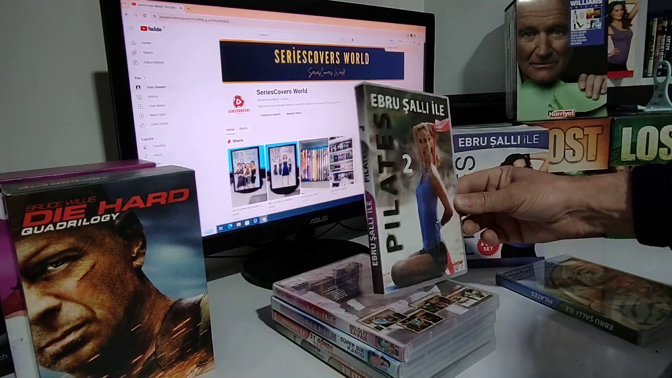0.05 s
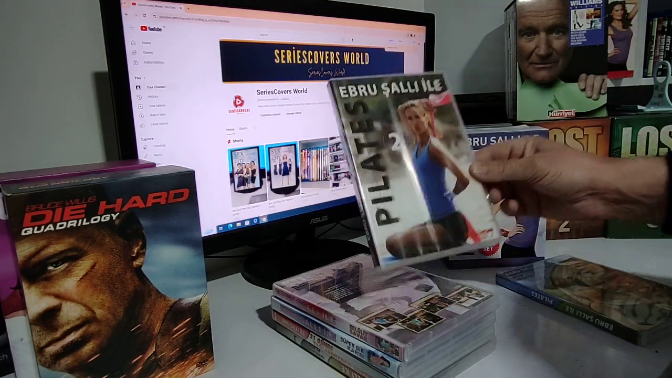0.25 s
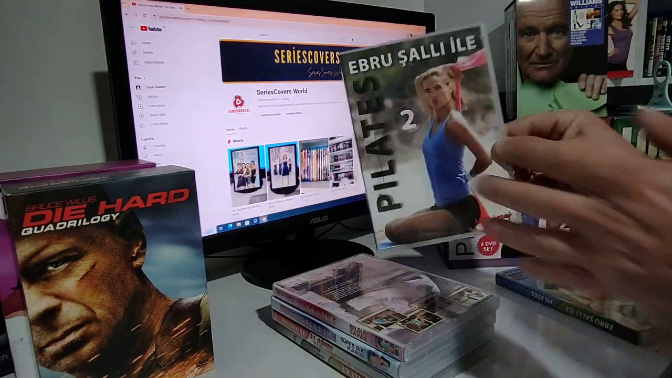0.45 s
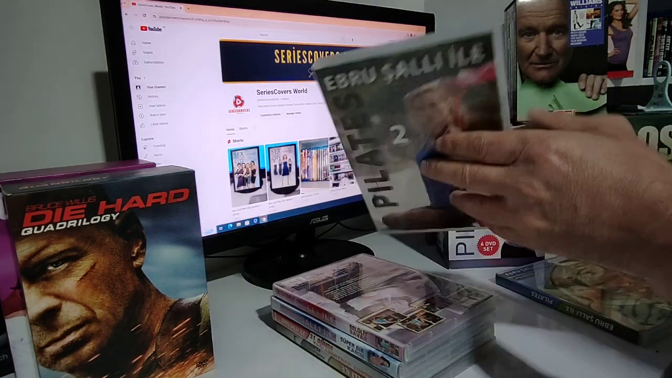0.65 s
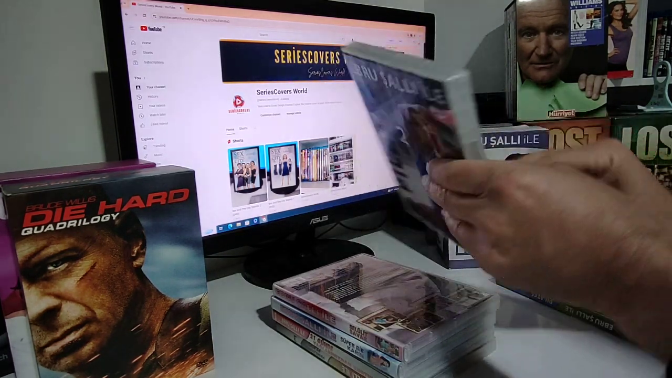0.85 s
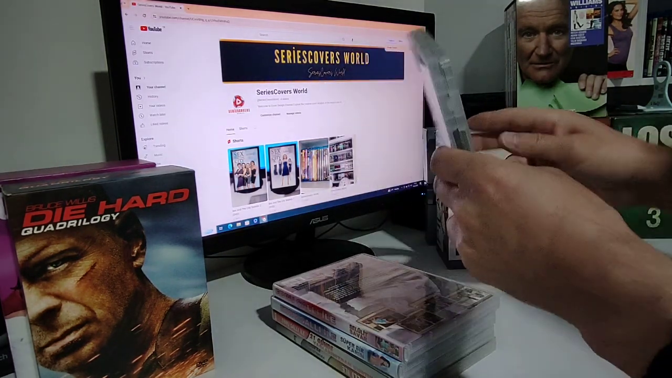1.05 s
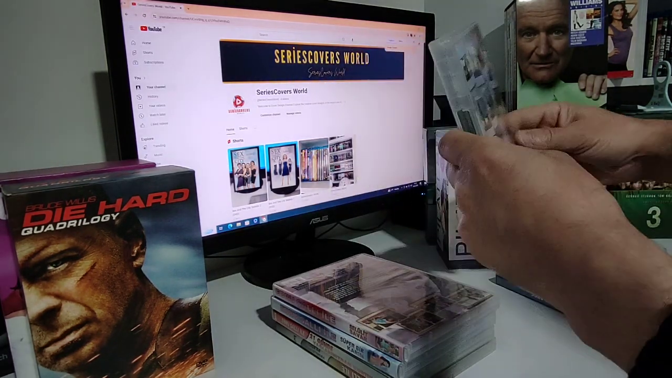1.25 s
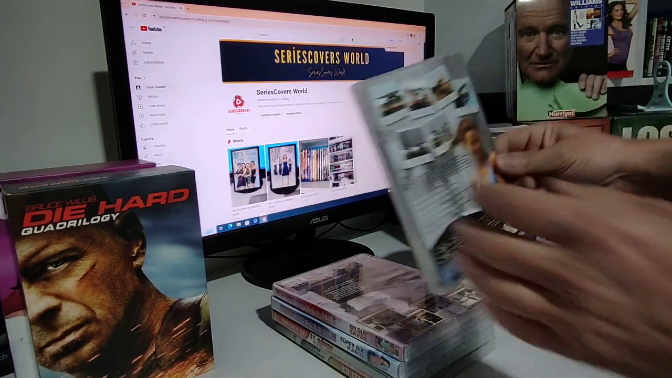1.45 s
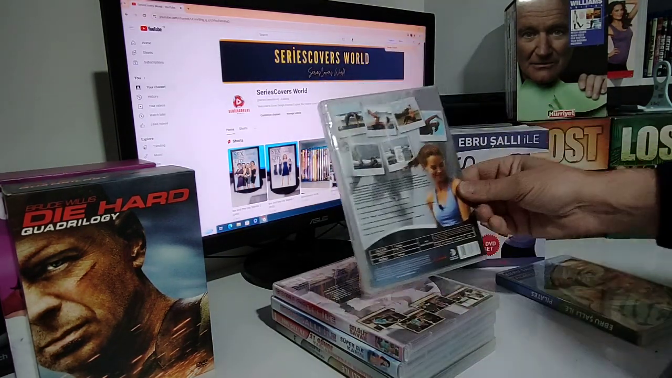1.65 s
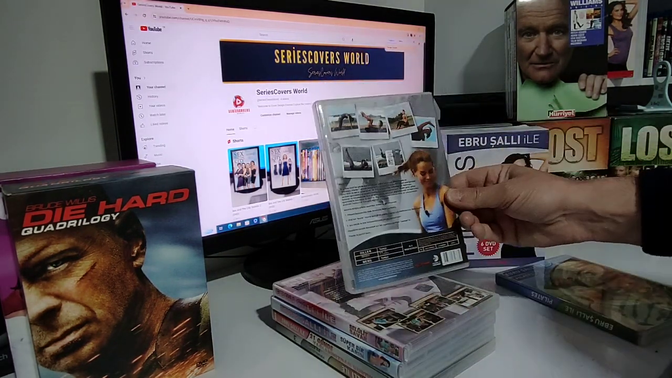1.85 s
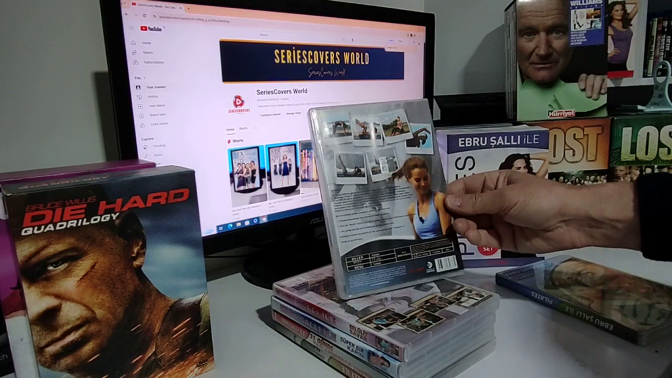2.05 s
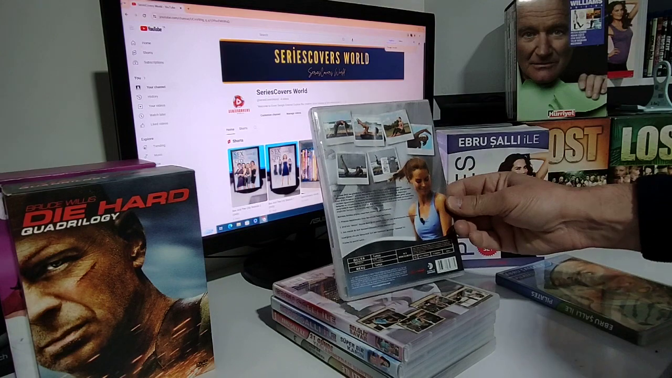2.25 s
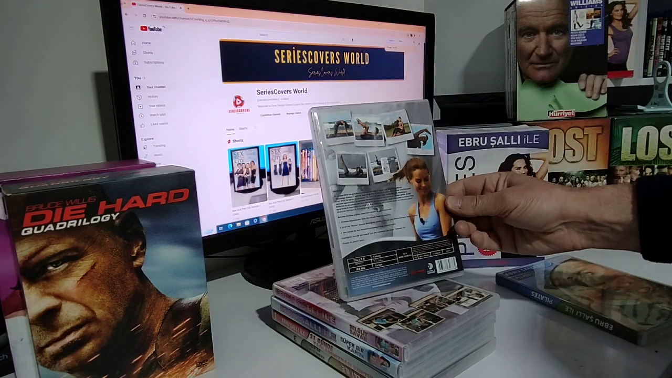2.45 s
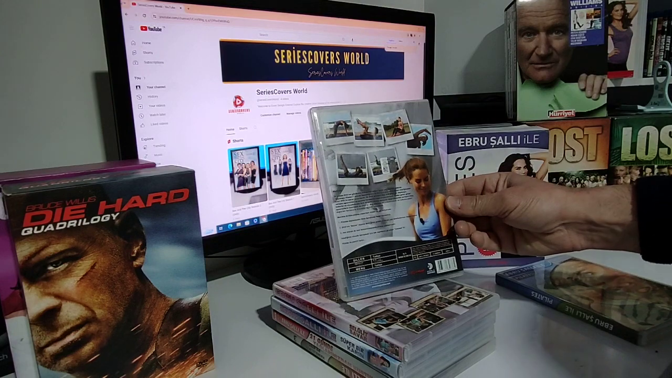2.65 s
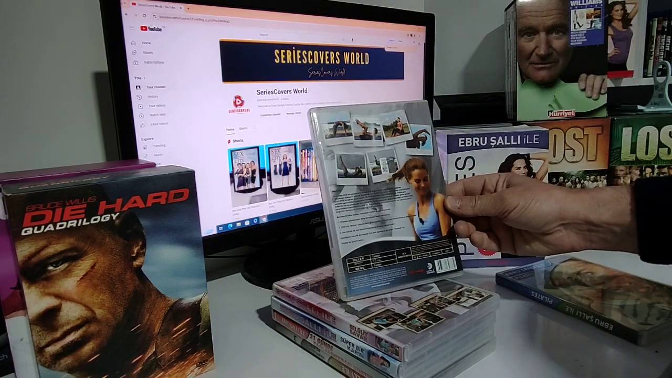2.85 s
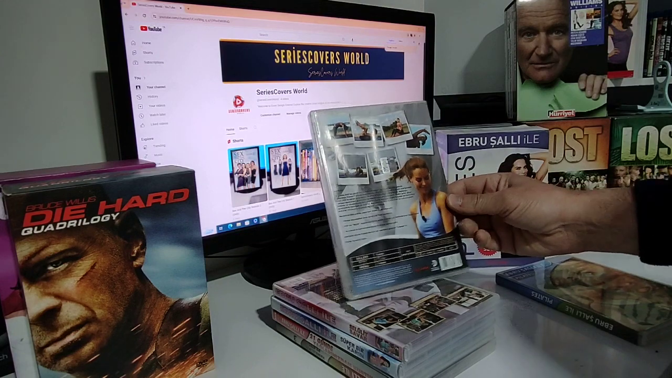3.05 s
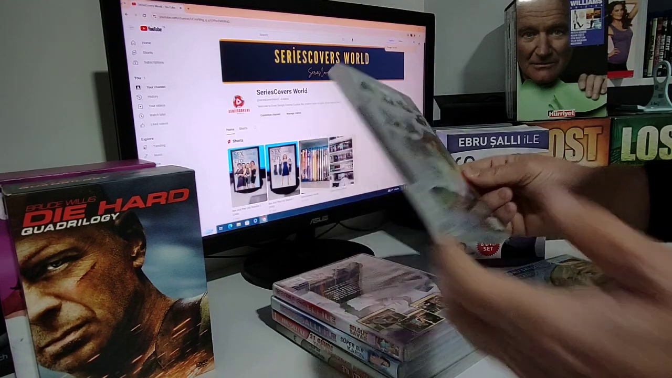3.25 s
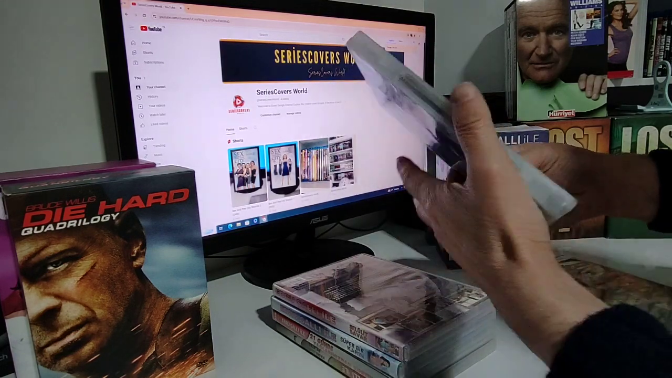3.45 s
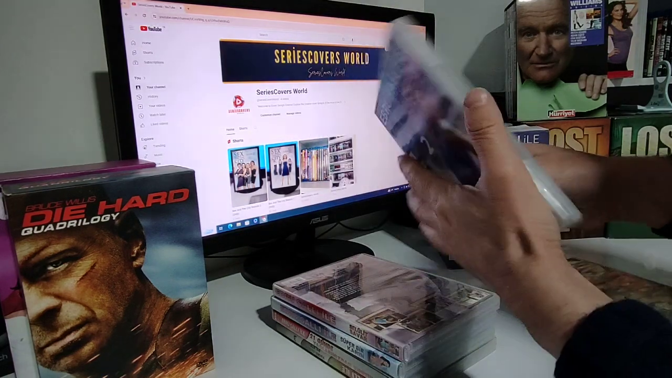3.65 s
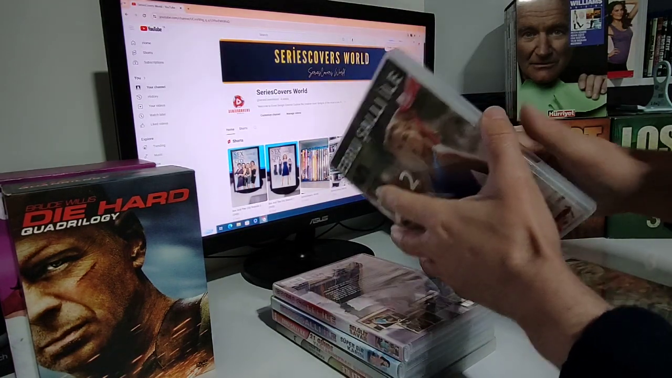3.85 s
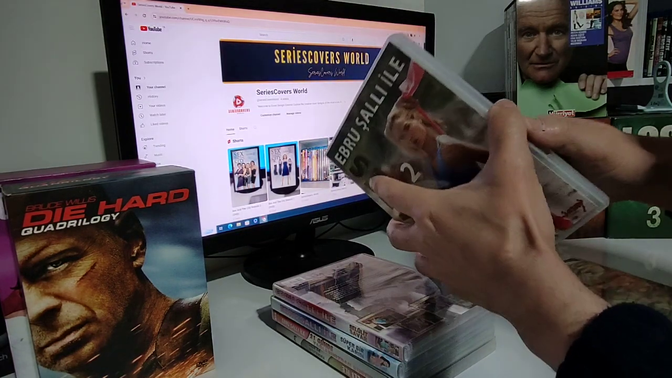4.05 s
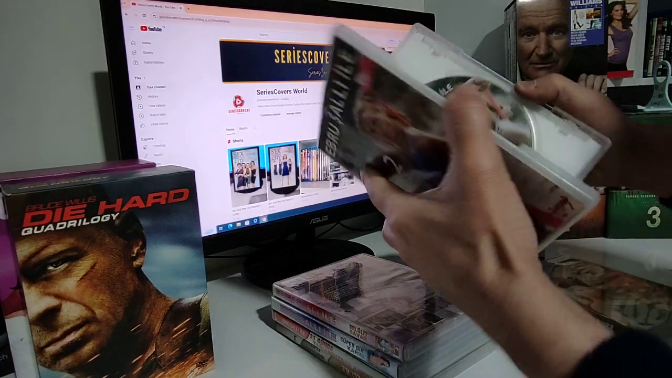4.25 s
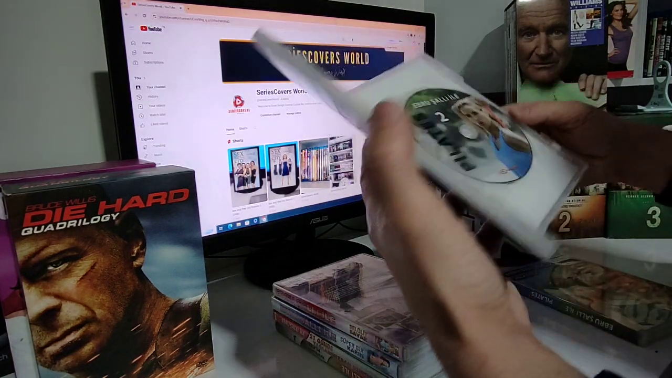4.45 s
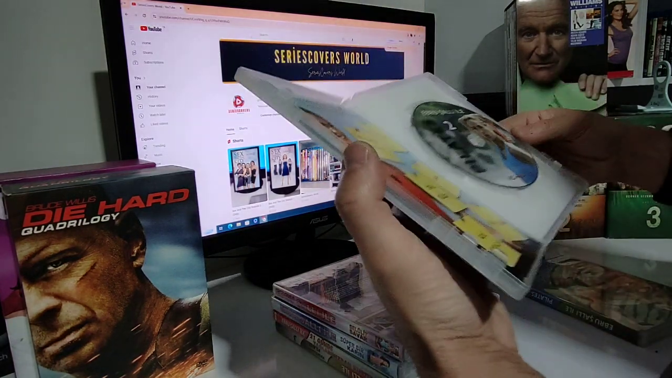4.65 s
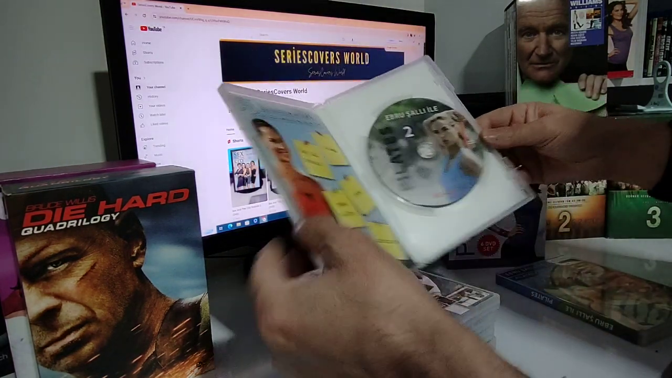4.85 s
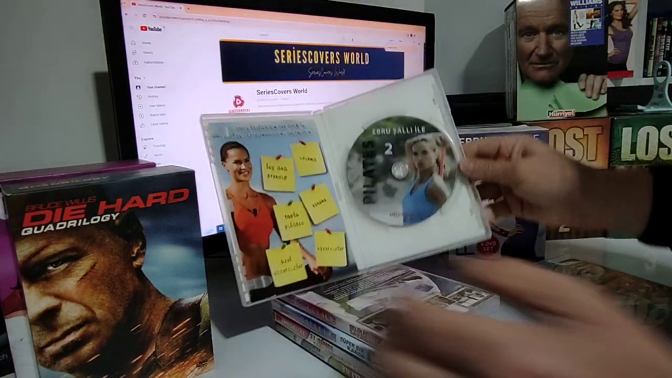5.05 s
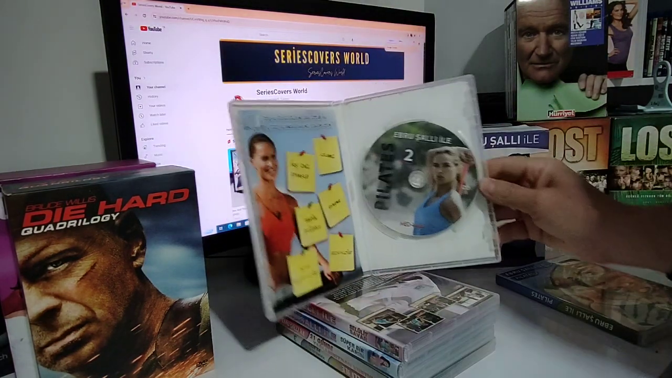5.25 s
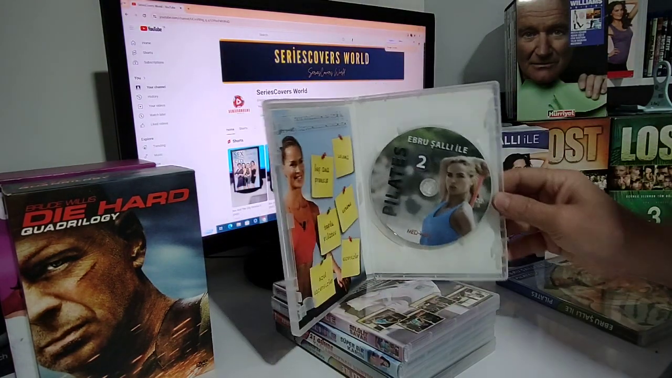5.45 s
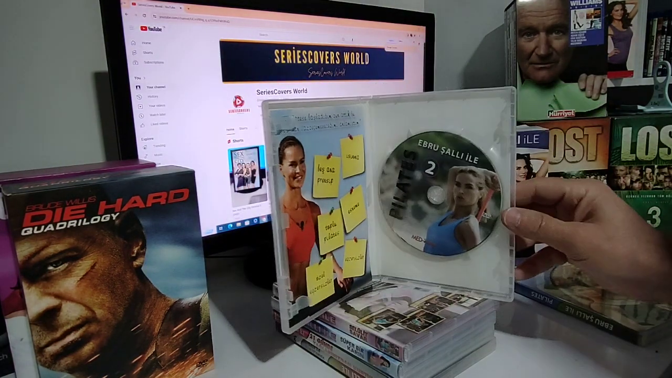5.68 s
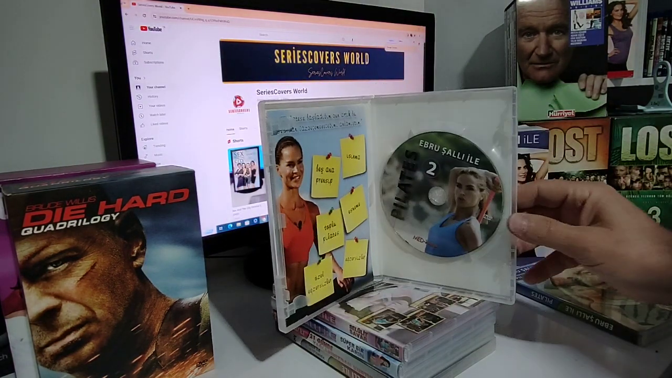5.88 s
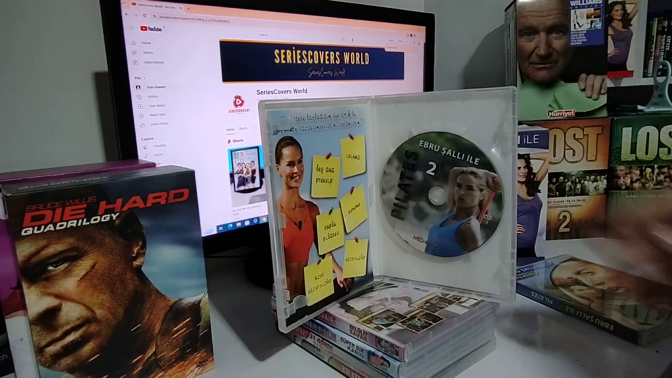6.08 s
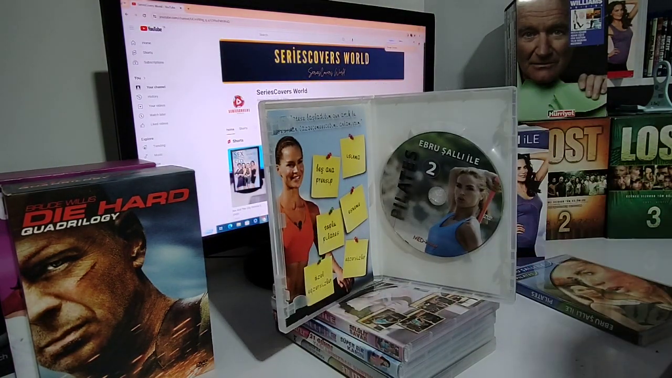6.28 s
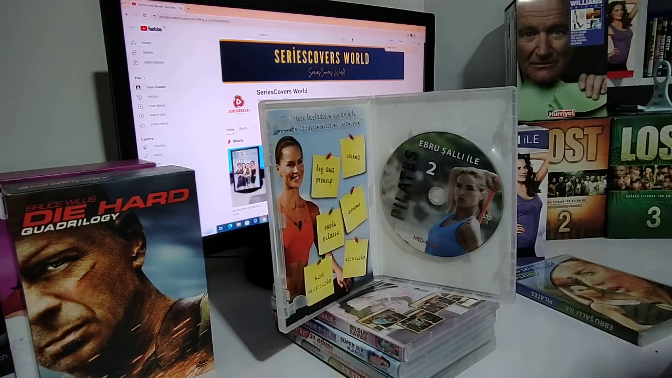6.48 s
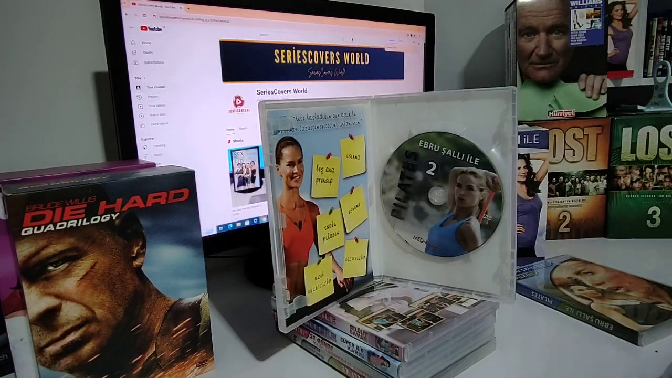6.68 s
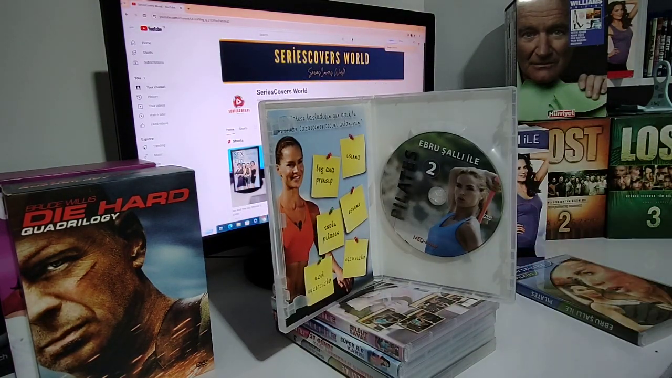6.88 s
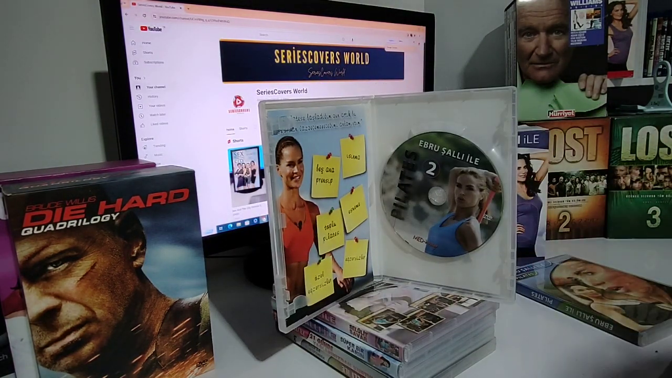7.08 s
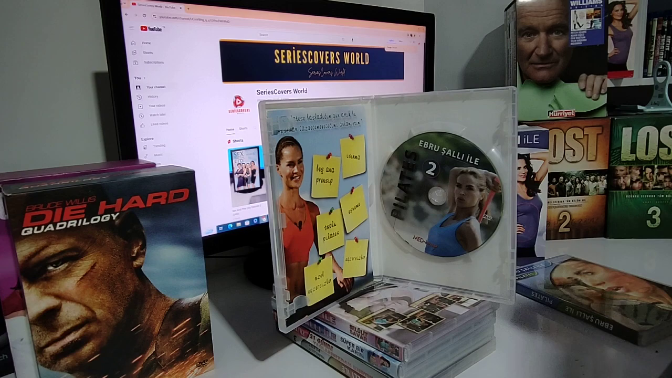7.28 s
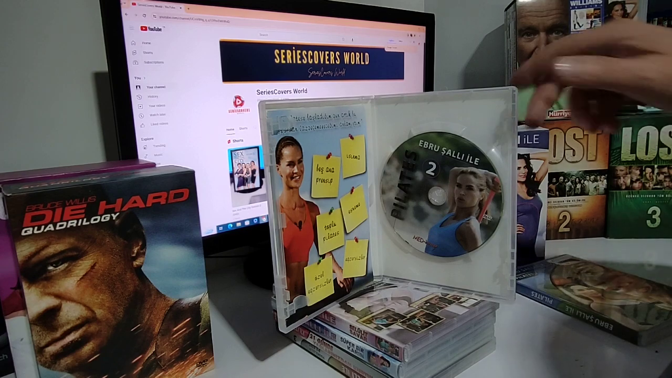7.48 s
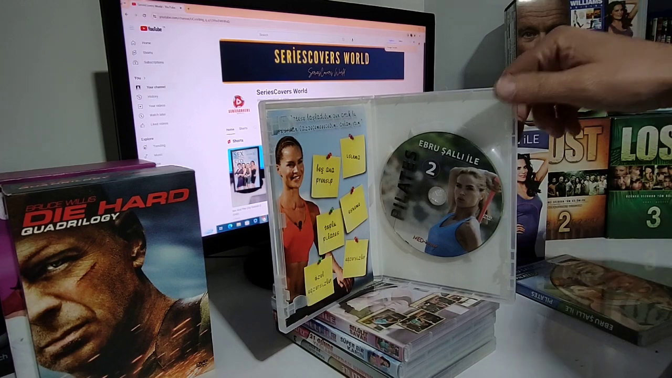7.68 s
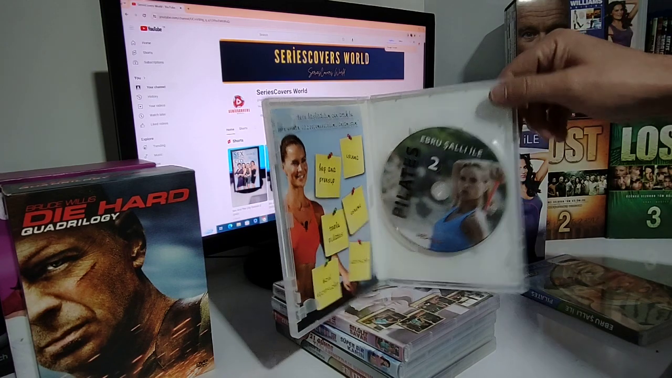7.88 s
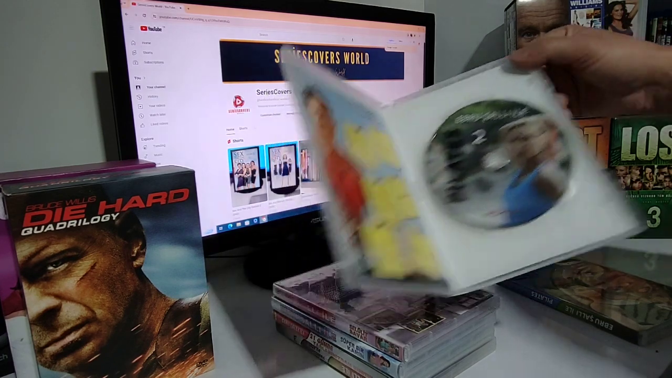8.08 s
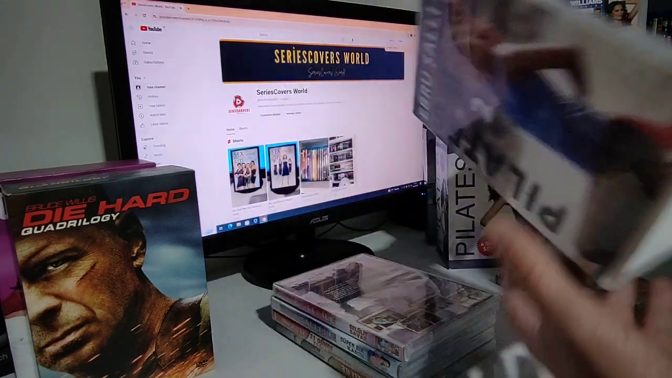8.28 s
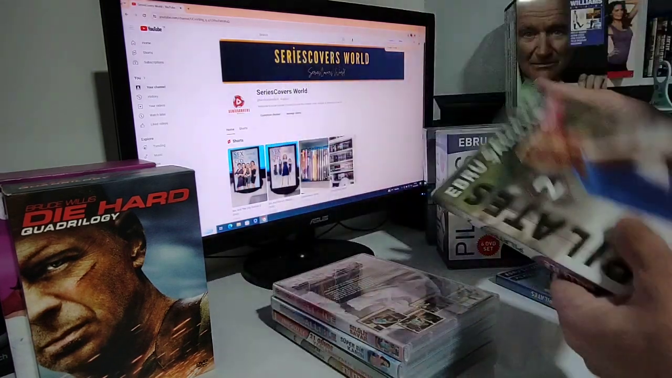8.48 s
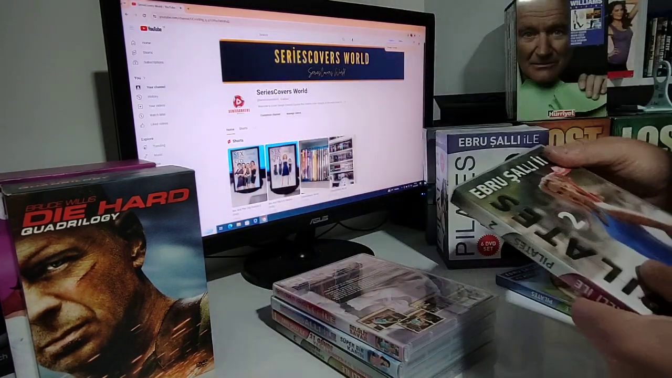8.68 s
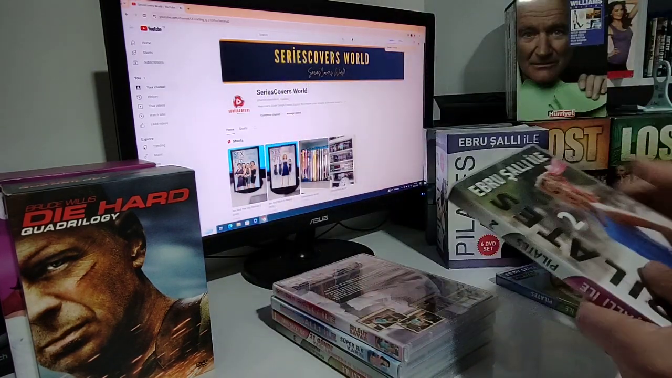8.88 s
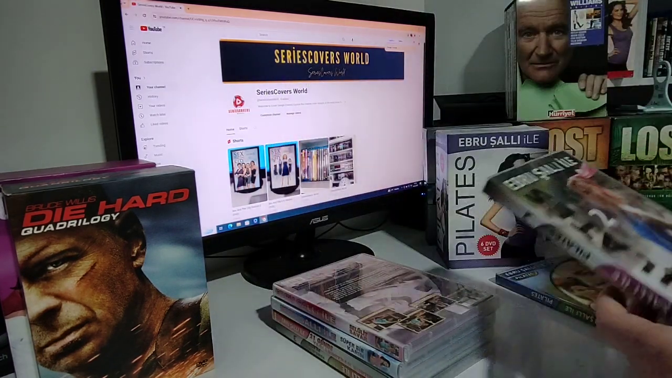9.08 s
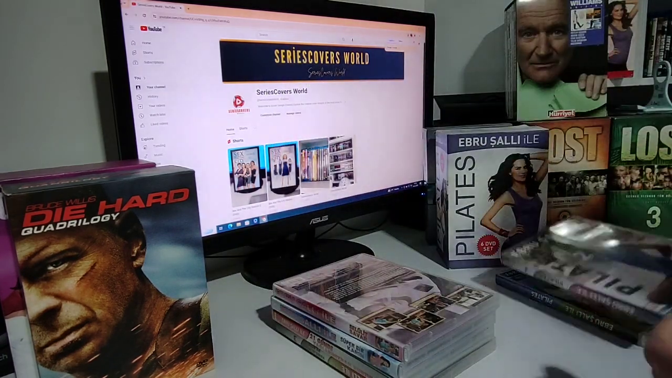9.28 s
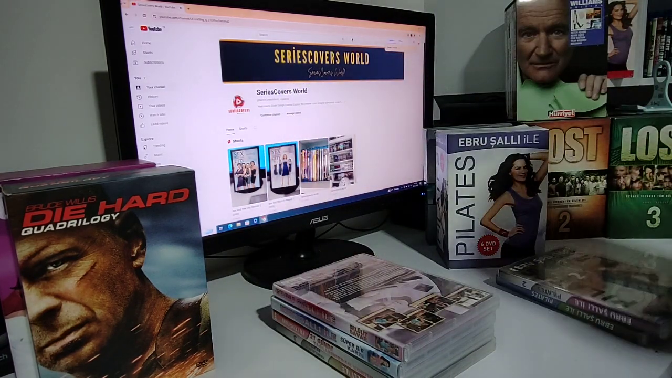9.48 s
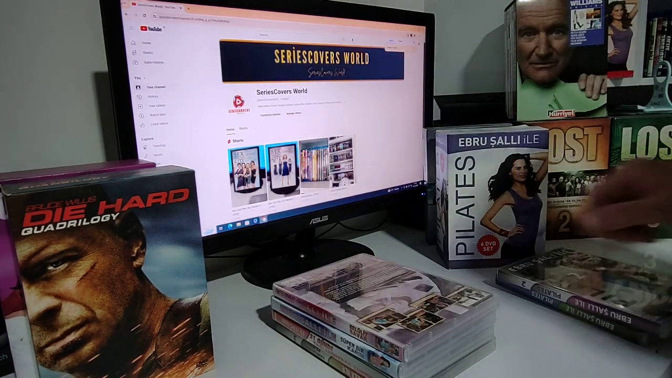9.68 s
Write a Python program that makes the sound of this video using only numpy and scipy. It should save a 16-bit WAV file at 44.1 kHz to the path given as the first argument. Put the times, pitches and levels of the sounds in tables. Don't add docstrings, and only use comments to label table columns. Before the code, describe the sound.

In a small, damped room, fingers rub and lightly knock a hollow plastic disc case. A sharp, loud snap opens it, the hinge creaks drily as it is stood on a pile, then near quiet. It is picked up, shut with two bright cracks, and laid down with a flat slap and low thump. A faint computer fan hum and hiss run beneath, heard close in stereo.

```python
import sys
import numpy as np
from scipy import signal
from scipy.fft import rfft, irfft, next_fast_len
from scipy.io import wavfile
from scipy.ndimage import uniform_filter1d

SR = 44100
rng = np.random.default_rng(int(sys.argv[2]) if len(sys.argv) > 2 else 0)


def wav_record(signal):
    frames = np.transpose(np.atleast_2d(signal))
    bounded = np.clip(frames, -1, 1)
    quanta = np.round(bounded * 32767).astype(np.int16)
    wavfile.write(sys.argv[1], SR, quanta)


def amplitude_ratio(level_db):
    exponent = np.asarray(level_db, float) / 20
    return 10 ** exponent


N = 429093
TOP_HZ = 16050


def unit(x):
    return x / np.sqrt(np.mean(x ** 2) + 1e-20)


def peak(x):
    return x / np.max(np.abs(x))


def along(points, hz):
    point_hz, value = np.transpose(points)
    return np.interp(np.log(hz + 1), np.log(point_hz + 1), value)


def filtered(x, response):
    length = x.shape[-1]
    padded = next_fast_len(length + 8192)
    spectrum = rfft(x, padded) * response(np.fft.rfftfreq(padded, 1 / SR))
    return irfft(spectrum, padded)[..., :length]


def coloured(x, spectrum):
    return unit(filtered(x, lambda hz: amplitude_ratio(along(spectrum, hz))))


# [hz, correlation]
LIKENESS = [(60, -0.28), (180, 0.73), (550, 0.092), (1650, -0.19), (4970, 0.27), (15000, 0.01)]


def stereo_noise(gain):
    turn = lambda hz: np.arccos(np.clip(along(LIKENESS, hz), -1, 1)) / 2
    split = lambda hz: gain(hz) * [np.cos(turn(hz)), np.sin(turn(hz))]
    mid, side = filtered(rng.standard_normal((2, N)), split)
    return unit(np.array([mid + side, mid - side]))


def at_ports(x, pan_db, lag_s):
    side = np.array([[.5], [-.5]])
    return amplitude_ratio(side * pan_db) * filtered(x, lambda hz: np.exp(-2j * np.pi * hz * lag_s * (side + .5)))


# [hz, t60_s]
ROOM_DECAY = [(150, .16), (1000, .165), (4000, .165), (14000, .15)]


def room_tail(size):
    hz, t, z = signal.stft(rng.standard_normal((2, size)), SR, nperseg=128)
    decay = amplitude_ratio(-60 * t / along(ROOM_DECAY, hz)[:, None])
    tail = signal.istft(z * decay, SR, nperseg=128)[1][:, :size]
    tail[1] += filtered(tail[0] - tail[1], lambda hz: 1 / (1 + (hz / 300) ** 2))
    tail = tail * np.clip(np.arange(size) / SR / .004 - .5, 0, 1)
    return tail / np.linalg.norm(tail[0])


# [hz, level_db per Hz]
FLOOR_SPECTRUM = [(5, -31), (9, 4.5), (20, -7), (64, -24.5), (100, -16), (189, -28.5), (277, -24.5),
                  (480, -30), (650, -34), (2400, -40.5), (6000, -49), (8900, -55.5), (12500, -51),
                  (15800, -48.5)]


def floor():
    return amplitude_ratio(-55) * stereo_noise(lambda hz: amplitude_ratio(along(FLOOR_SPECTRUM, hz)))


# [pitch_hz, level_db rms, width_hz]
FAN_TONES = [(92.5, -71, 2.8), (274.7, -73, 7), (473, -86, 2), (755, -87, 2), (843, -91, 2)]


def fan():
    t = np.arange(N) / SR
    out = np.zeros((2, N))
    for pitch_hz, level_db, width_hz in FAN_TONES:
        fuzz = stereo_noise(lambda hz: 1 / (1 + ((hz - pitch_hz) / width_hz) ** 2))
        core = amplitude_ratio(-3) * np.sin(2 * np.pi * pitch_hz * t)
        out += amplitude_ratio(level_db) * (fuzz + core)
    return out


# [time_s, level_db]
WAFTS = [
    (.57, -68),
    (2.1, -70),
    (2.9, -70),
    (5.4, -66),
    (5.75, -69),
    (7.2, -66.5),
    (8.55, -63),
    (9.2, -66),
    (9.4, -61),
    (9.561, -62),
]
# [hz, level_db per Hz]
WAFT_SPECTRUM = [(12, -20.5), (25, -2.5), (60, -2.5), (110, -24), (200, -64.5)]
# [time_s, level_db]
RUSTLE = [(0, -81.5), (.55, -74), (1.27, -74.5), (1.7, -71), (2.1, -83), (2.9, -84), (3.3, -75.5),
          (3.7, -69), (4.3, -70), (4.8, -80), (5.3, -68.5), (5.8, -81.5), (6.4, -74), (6.8, -85),
          (7.8, -73), (8.2, -75), (8.8, -79.5), (9.72, -80.5)]
# [hz, level_db]
CLOTH_SPECTRUM = [(2000, -29), (4500, 2), (8800, -18), (12500, -1.5), (16000, -4.5)]


def arms():
    t = np.arange(N) / SR
    air = amplitude_ratio(-70)
    for time_s, level_db in WAFTS:
        air = air + amplitude_ratio(level_db) * np.exp(-((t - time_s) / .15) ** 2)
    push = air * stereo_noise(lambda hz: amplitude_ratio(along(WAFT_SPECTRUM, hz)))
    rustle = amplitude_ratio(np.interp(t, *np.transpose(RUSTLE)))
    return push + rustle * stereo_noise(lambda hz: amplitude_ratio(along(CLOTH_SPECTRUM, hz)))


# [start_s, peak_db, pitch_hz, t60_s]
DESK_THUMPS = [
    (2.069, -45, 130, 0.069),
    (3.74, -51.5, 37.7, 0.11),
    (5.118, -55, 48.4, 0.089),
    (7.899, -54.5, 90, 0.16),
    (8.368, -44.5, 43.1, 0.12),
    (8.498, -34.5, 45.7, 0.054),
    (8.656, -33.5, 127, 0.07),
    (9.393, -39, 125, 0.32),
    (9.532, -35.5, 125.6, 0.11),
]


def desk():
    out, t = np.zeros(N + SR), np.arange(SR // 2) / SR
    for start_s, peak_db, pitch_hz, t60_s in DESK_THUMPS:
        onset = 1 - np.exp(-t / .002)
        sway = np.sin(2 * np.pi * pitch_hz * t)
        out[round(start_s * SR):][:len(t)] += amplitude_ratio(peak_db + 3 - 60 * t / t60_s) * sway * onset
    return out[:N]


# [most_pressure_s, rise_s,
# fall_s, drag_db, hiss_over_drag_db]
STROKES = [(0.108, .05, 0.083, -68, -2), (0.43, 0.29, 0.28, -74.5, 3), (0.62, .03, 0.11, -74.5, 6.5),
           (0.744, .03, .02, -62, -8), (0.805, .04, 0.034, -53, -8), (1.262, .02, 0.016, -58.5, -16),
           (1.308, .03, 0.014, -50.5, -7), (2.07, .01, 0.005, -53, -14),
           (3.012, .04, 0.35, -73.5, 1.5), (3.342, .2, 0.27, -76, 4.5),
           (3.484, .004, 0.09, -61, 12.5), (3.65, .025, 0.052, -46, 0), (3.575, .01, .05, -64, 3),
           (3.684, .05, 0.03, -45, -3), (3.76, .03, .03, -49, -19.5), (3.826, .04, .15, -59, -2.5),
           (3.934, .02, 0.023, -55, -12.5), (4.048, .06, 0.037, -54, -13), (4.2, .05, .08, -72, 7),
           (4.36, .15, 0.31, -66, 4), (4.7, .07, 0.036, -66.5, 8.5), (4.766, .004, .05, -71, 25),
           (5.13, .02, 0.15, -60.5, -14), (5.356, 0.16, 0.061, -61.5, -4.5),
                (5.579, .04, 0.12, -62.5, -7), (5.696, 0.028, 0.13, -64, -7),
                (6.416, 0.072, .07, -74, 14.5), (7.03, .01, 0.026, -54.5, -11),
                (7.06, 0.11, 0.044, -71, 12.5), (7.76, .03, .02, -62.5, -3), (7.82, .05, .02, -63, -9.5),
                (7.91, .02, .07, -55.5, -4.5), (8.39, .01, 0.058, -61, -5), (8.436, .03, 0.023, -59, 13),
                (8.445, 0.012, 0.22, -55, -7.5), (8.485, 0.12, 0.047, -50, -13),
                (8.53, .02, 0.045, -69.5, -2), (8.81, 0.06, .03, -63, 1.5), (8.94, 0.076, 0.017, -69, -10),
                (9.06, .02, 0.08, -61.5, 6.5), (9.132, .08, 0.025, -68.5, 10.5), (9.46, .02, .1, -52, -14),
                (9.497, .04, 0.026, -48.5, -14), (9.538, .02, 0.065, -52.5, -15)]
# [hz, level_db per Hz]
DRAG_SPECTRUM = [(180, -43.5), (300, -17), (688, -9.5), (850, -5.5), (1480, -10), (2190, -8), (2380, -16.5),
                 (3170, -8.5), (7000, -19), (9100, -32.5), (15400, -120)]
# [hz, level_db per Hz]
SKIN_SPECTRUM = [(2500, -14.5), (5000, -8.5), (7000, -10), (9000, -15.5), (12000, -5), (16000, -7.5)]


def slips(spike_db):
    leaps = np.minimum(rng.exponential(size=N // 32 + 1), 4)
    return amplitude_ratio(spike_db * np.repeat(leaps, 32)[:N]) * rng.standard_normal(N)


def fingers():
    size, t = SR // 4, np.arange(N) / SR
    drag = coloured(slips(spike_db=4), DRAG_SPECTRUM)
    hiss = coloured(slips(spike_db=3), SKIN_SPECTRUM)
    power = np.zeros((2, N))
    for most_s, rise_s, fall_s, drag_db, hiss_db in STROKES:
        near = slice(max(round((most_s - 1) * SR), 0), round((most_s + 1) * SR))
        away = np.maximum((most_s - t[near]) / rise_s, (t[near] - most_s) / fall_s)
        power[:, near] += amplitude_ratio([[drag_db], [drag_db + hiss_db]] - 20 * away) ** 2
    rub = np.sqrt(power[0]) * drag + np.sqrt(power[1]) * hiss
    out = np.pad(at_ports(rub, pan_db=-2, lag_s=.00012), ((0, 0), (0, size)))
    for span in np.array_split(np.arange(N), 17):
        walls = signal.fftconvolve(rub[span][None], room_tail(size), axes=1)
        out[:, span[0]:][:, :walls.shape[1]] += amplitude_ratio(-1.5) * walls
    return out[:, :N]


def ring(modes, t, weight_db, detune=.03):
    hz, level_db, t60_s = np.transpose(modes)[:, :, None]
    pitch_luck, level_luck = rng.standard_normal((2, len(modes), 1))
    phase = (-1) ** np.arange(len(modes))[:, None]
    sway = phase * np.sin(2 * np.pi * hz * (1 + detune * pitch_luck) * t)
    return np.sum(amplitude_ratio(level_db + weight_db(hz) + 2 * level_luck - 60 * t / t60_s) * sway, axis=0)


def chatter(force):
    spectrum = rfft(force * rng.standard_normal(len(force)))
    return np.sqrt(force) * irfft(spectrum / np.abs(spectrum), len(force))


def voiced(rows, crack_db):
    return [(*row, row[-1] + crack_db) for row in rows]


# [pitch_hz, level_db, t60_s]
PANELS = [(430, -5, .025), (700, 0, .022), (980, 0, .022), (1230, 0, .02), (1480, 1, .018), (1780, 2, .016)]
# [pitch_hz, level_db, t60_s]
RIBS = [(2150, 0, .013), (2650, -1, .012), (3250, -1, .012), (4000, -4, .008), (4750, -5, .007),
        (5500, -7, .006)]
# [pitch_hz, level_db, t60_s]
CAVITY = [(142, -3, 0.056), (226.8, -1, 0.057), (367.2, -4.5, 0.023)]
# [hz, level_db]
CRACK_SPECTRUM = [(1500, -29.5), (3500, 1.5), (6500, 5.5), (9000, -5.5), (12000, -2), (16500, -9.5)]
# [time_s, later_arrival_at_left_s, left_right_db]
HANDS = [(0, .00005, -2), (.8, .00003, 1), (1.3, .0002, -2), (2, -.00004, 1.5), (3.5, .0002, -5),
         (3.7, .00005, -1), (4.1, .0002, -1), (4.14, .00011, -.5), (4.76, .00003, -4), (5.1, .00003, 2.5),
         (5.7, .00012, 1), (7, .00022, -3), (7.9, .00008, 0), (8.4, .0002, -1), (8.6, .00021, -2.5),
         (8.96, .00028, -2.5), (8.98, .0003, 2), (9.4, .00019, -1), (9.7, .00022, -1)]


def contacts(events, chatter_s, wet_db, focus_db, stiff=RIBS, detune=.03, blur=40):
    size = SR // 4
    out, t = np.zeros((2, N + size)), np.arange(size) / SR
    when, lags, pans = np.transpose(HANDS)
    grid = np.fft.rfftfreq(size, 1 / SR)
    click = np.zeros(size)
    click[24] = 1
    brittle = coloured(click, CRACK_SPECTRUM)
    even = lambda hz: 0 * hz
    radiated = lambda hz: (1j * hz / (90 + 1j * hz)) ** 2
    for start_s, peak_db, panel_hz, thud_db, ribs_db, crack_db in events:
        others = [mode for mode in PANELS if abs(np.log(mode[0] / panel_hz)) > .13]
        struck = (panel_hz, 4, min(.03, 28 / panel_hz))
        panels = ring(sorted(others + [struck]), t, lambda hz: -focus_db * np.abs(np.log2(hz / panel_hz)))
        ribs = ring(stiff, t, even, detune)
        cavity = ring(CAVITY, t, even)
        parts = filtered(np.array([unit(panels),
                                   amplitude_ratio(thud_db + 6.5) * unit(cavity),
                                   amplitude_ratio(ribs_db + 5) * unit(ribs),
                                   amplitude_ratio(crack_db + 3.5) * brittle]), radiated)
        force = (1 - np.exp(-t / min(.0013, chatter_s / 3))) * np.exp(-(t / chatter_s) ** 2)
        knock = peak(signal.fftconvolve(parts.sum(axis=0), chatter(force))[:size])
        power = np.sum(np.abs(rfft(parts)) ** 2, axis=0)
        blurred = np.sqrt(np.abs(uniform_filter1d(power, size=blur)))
        walls = filtered(room_tail(size), lambda hz: np.interp(hz, grid, blurred) * (hz < TOP_HZ))
        walls = walls * np.linalg.norm(knock) / np.linalg.norm(walls[0])
        direct = at_ports(knock, np.interp(start_s, when, pans), np.interp(start_s, when, lags))
        heard = amplitude_ratio(peak_db + .5) * (direct + amplitude_ratio(wet_db) * walls)
        out[:, round((start_s - .001) * SR):][:, :size] += heard
    return out[:, :N]


# [start_s, peak_db, panel_hz, thud_db, brightness_db]
SNAPS = [
    (0.648, -43.5, 420, -20, -12),
    (0.808, -32, 427, -13, -15),
    (3.484, -45, 2100, -21, 16),
    (3.501, -42.5, 2100, -25, 11),
    (3.747, -36.5, 1700, -55, -9.5),
    (7.855, -37, 643, -9, -12),
    (7.892, -34.5, 735, -15, -12),
    (8.353, -51.5, 423, -30, 1),
    (8.3735, -27, 662, -16, 5),
    (8.79, -49.5, 435, -11, -2.5),
]
CATCHES = [
    (8.632, -30, 1470, -6.5, -4.5),
    (8.959, -28, 4000, -9, -6),
    (9.476, -29, 2000, -9, -4),
    (9.494, -38.5, 890, -5, -16),
]
TICKS = [(1.259, -52.5, 404, -7, -12), (1.783, -59, 3900, -30, -13), (2.098, -47.5, 1030, -10, -8),
         (2.132, -53, 900, -17, -7), (3.455, -53, 4310, -11, 11.5), (3.813, -45.5, 975, -9, -13.5),
         (4.763, -55, 868, -20.5, -12), (7.759, -48.5, 770, -6.5, -12), (7.923, -45, 700, -10.5, -15.5),
         (8.828, -46.5, 996, -10, -12), (9.574, -46, 776, -8.5, -13), (9.609, -55, 3300, -20, -8),
         (9.634, -53, 3300, -15, -8)]
SLAPS = [
    (4.1055, -20, 2080, -9, -12),
    (5.107, -34.5, 434, -5.5, -13),
    (7.03, -47, 466, -8, -14),
    (8.376, -35, 407, -17, -5),
    (8.501, -25, 1230, -10.5, -7),
    (9.394, -17.5, 760, -8, -10),
    (9.531, -39, 760, -5, -12),
]
# [start_s, peak_db, panel_hz, brightness_db]
CREAKS = [(4.904, -41.5, 674, -6), (5.009, -37, 676, -4.5), (5.025, -56, 617, -19), (5.155, -50, 764, -14),
          (5.183, -56, 797, -22), (5.236, -52.5, 611, -6), (5.318, -49, 813, -10), (5.334, -41.5, 644, -14),
          (5.353, -40.5, 643, -12), (5.392, -45.5, 680, -9), (5.431, -46.5, 650, -13.5),
          (5.491, -44.5, 664, -8.5), (5.582, -50, 630, -14), (5.697, -46, 667, -24.5),
          (5.717, -45.5, 637, -15), (5.754, -49.5, 635, -10), (5.821, -53, 416, -15)]
# [pitch_hz, level_db, t60_s]
OPEN_LID_RIBS = [(1300, -4, 0.0432), (1731, -6, .035), (2280, -1.5, 0.029), (2700, -2.5, .035),
                 (3360, -5.5, .025), (4010, -6, .02), (4600, -15, .02)]


def case():
    snaps = contacts(voiced(SNAPS, crack_db=-1.5), chatter_s=.0035, wet_db=-6, focus_db=4.5)
    catches = contacts(voiced(CATCHES, crack_db=-3), chatter_s=.002, wet_db=-3, focus_db=4)
    ticks = contacts(voiced(TICKS, crack_db=-5), chatter_s=.0036, wet_db=-4, focus_db=8.5)
    slaps = contacts(voiced(SLAPS, crack_db=-4), chatter_s=.009, wet_db=-1.5, focus_db=2)
    thud_db = -9
    creaks = [(start_s, peak_db, panel_hz, thud_db, bright_db) for start_s, peak_db, panel_hz, bright_db in CREAKS]
    hinge = contacts(voiced(creaks, crack_db=-10), chatter_s=.003, wet_db=-2, focus_db=12,
                     stiff=OPEN_LID_RIBS, detune=.0061, blur=8)
    return snaps + catches + ticks + slaps + hinge


# [start_s, peak_db, panel_hz, thud_db, brightness_db]
TAPS = [(0.6365, -35, 3500, -25, -10), (0.659, -52, 3500, -25, 0), (2.0605, -37, 800, -8, -30),
        (2.066, -46, 450, -12, -3), (3.571, -54, 767, -20, 0), (3.736, -42, 786, -15, -8),
        (4.765, -46, 4000, -30, 14), (7.028, -44, 1900, -8, -8), (8.37, -32, 500, -8, 6),
        (8.443, -42, 694, -10, -8), (8.448, -43, 1500, -15, -8), (8.467, -46, 2300, -20, 2),
        (8.485, -44, 1230, -15, -8), (8.503, -27, 1230, -15, 7), (8.51, -30, 1230, -8, -8),
        (9.391, -24, 900, -10, -15), (9.528, -33, 1700, -8, -2), (9.541, -44, 3900, -10, -5)]
JUDDER = [(0.74, -56, 1380, -30, -20), (0.786, -51, 1380, -30, -20), (0.801, -51, 1380, -30, -6),
          (3.635, -48, 1240, -30, -8), (3.648, -43, 982, -30, -8), (3.658, -40, 1060, -30, -8),
          (3.668, -41, 1240, -30, -8), (3.679, -36, 982, -30, -12), (3.695, -39, 900, -25, -12),
          (3.709, -43, 980, -25, -15), (9.414, -30, 900, -15, -8), (9.43, -36, 800, -12, -10),
          (9.455, -42, 800, -10, -12), (9.505, -47, 800, -10, -15), (9.552, -44, 800, -10, -12)]


def edges():
    taps = contacts(voiced(TAPS, crack_db=-2), chatter_s=.0009, wet_db=-4, focus_db=11)
    judder = contacts(voiced(JUDDER, crack_db=-4), chatter_s=.005, wet_db=-3, focus_db=10)
    return taps + judder


# [start_s, peak_db, panel_hz, thud_db, brightness_db]
OPENING = (4.135, -4, 1200, -16, -8)
SHUTTING = (8.6545, -11, 850, -9.5, -3)
LOCKING = (8.979, -8.5, 990, -41, 0)
# [pitch_hz, level_db, t60_s]
OPENING_RIBS = [(520, 0, .025), (1340, 3, .02), (2150, 2, .014), (2900, -3, .012), (3350, -3, .012),
                (3900, -8, .01), (4750, -10, .008)]
SHUTTING_RIBS = [(571, 3, .03), (1350, 0, .025), (1720, 3, .02), (2030, 4, .02), (2610, -1, .015),
                 (3300, 2, .018), (4100, -4, .01), (6480, -3, .012)]
LOCKING_RIBS = [(1360, 2, .025), (1690, 0, .02), (1970, 2, .02), (2380, 0, .015), (2600, 1, .015),
                (2790, 0, .015), (3220, 2, .016), (3450, -2, .012), (4300, -2, .01), (5160, 0, .012),
                (5710, -2, .01)]
# [chatter_s, crack_over_ribs_db]
LATCH_GRIPS = [
    (.002, -7),
    (.003, 0),
    (.005, -5),
]


def latches():
    rows = [OPENING, SHUTTING, LOCKING]
    ribs = [OPENING_RIBS, SHUTTING_RIBS, LOCKING_RIBS]
    out = np.zeros((2, N))
    for row, freed, (chatter_s, crack_db) in zip(rows, ribs, LATCH_GRIPS):
        out += contacts(voiced([row], crack_db), chatter_s, wet_db=-6, focus_db=15,
                        stiff=freed, detune=.004, blur=30)
    return out


def scene():
    steady = floor() + fan() + arms() + amplitude_ratio(-.5) * fingers()
    return filtered(steady, lambda hz: hz < TOP_HZ) + desk() + case() + edges() + latches()


def roll_off(x):
    return signal.sosfilt(signal.butter(12, 16990, fs=SR, output="sos"), x)


def record(dry):
    limited = filtered(dry, lambda hz: 1 / (1 + (hz / 16700) ** 80))
    return roll_off(limited)


dry = scene()
out = record(dry)
wav_record(out)
```